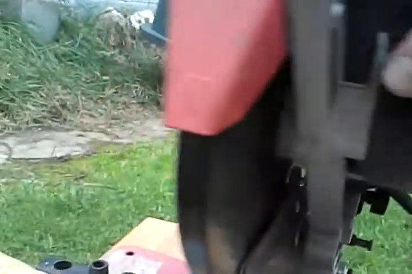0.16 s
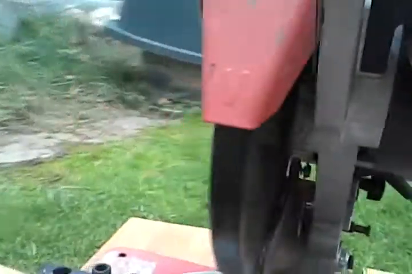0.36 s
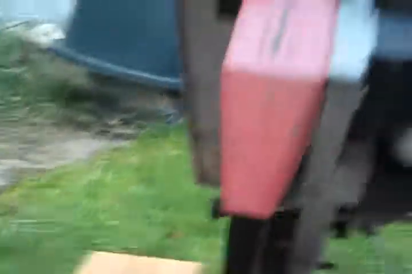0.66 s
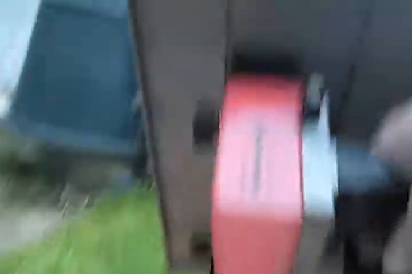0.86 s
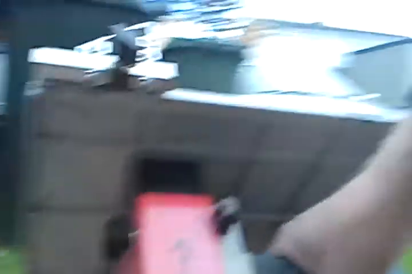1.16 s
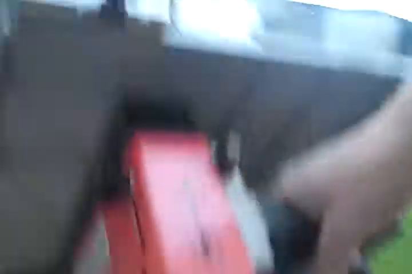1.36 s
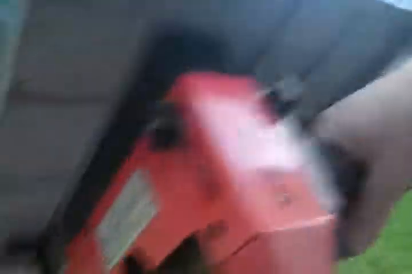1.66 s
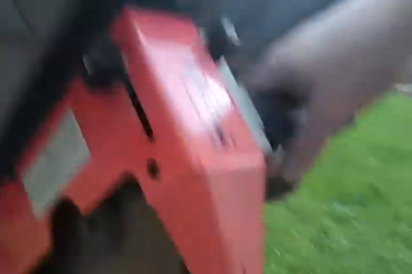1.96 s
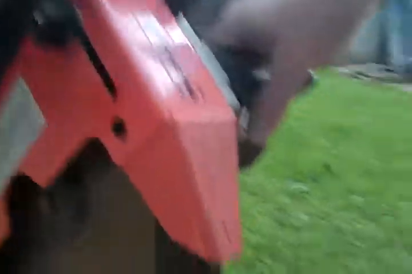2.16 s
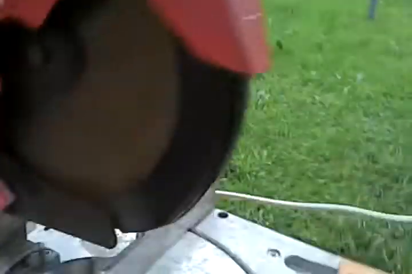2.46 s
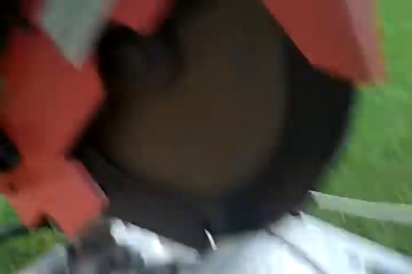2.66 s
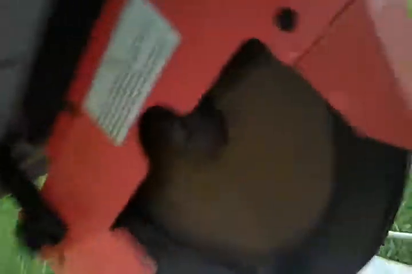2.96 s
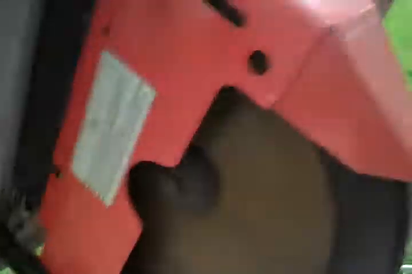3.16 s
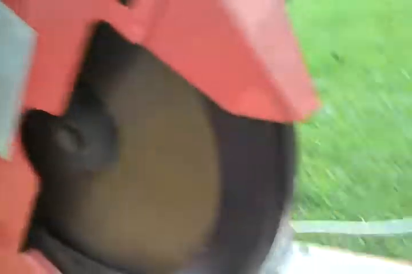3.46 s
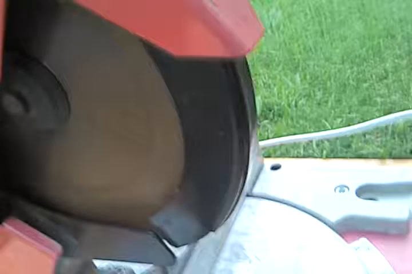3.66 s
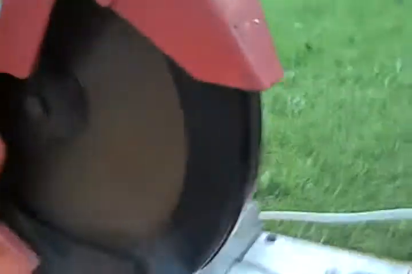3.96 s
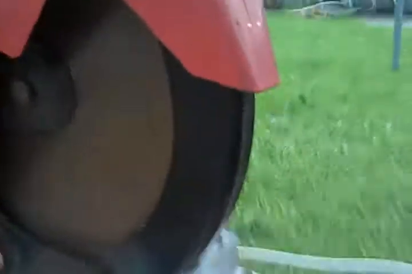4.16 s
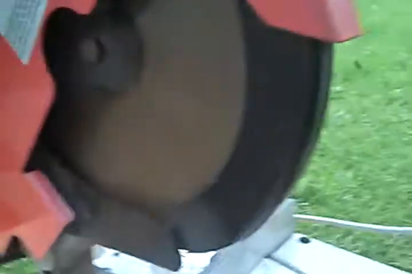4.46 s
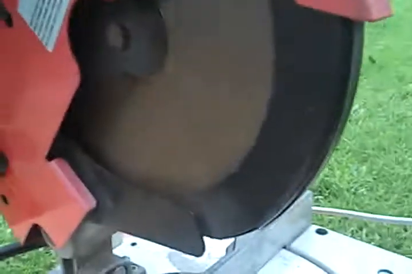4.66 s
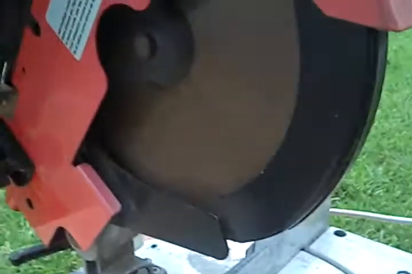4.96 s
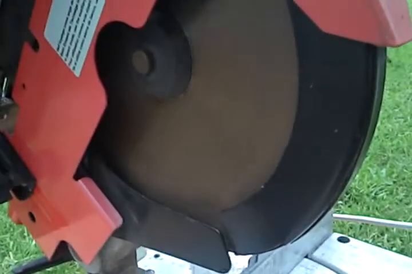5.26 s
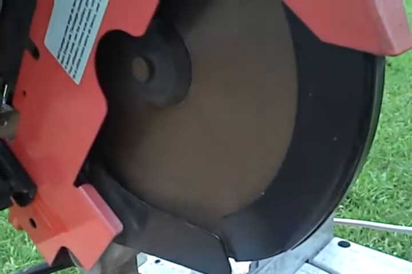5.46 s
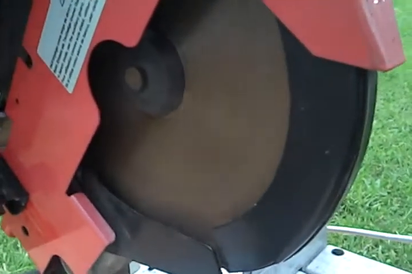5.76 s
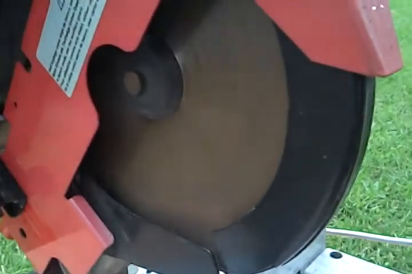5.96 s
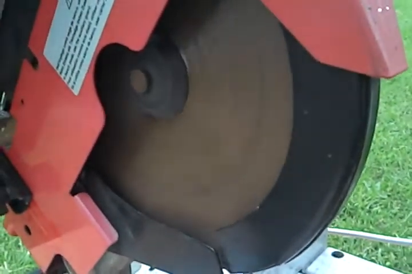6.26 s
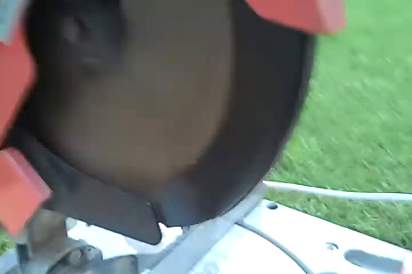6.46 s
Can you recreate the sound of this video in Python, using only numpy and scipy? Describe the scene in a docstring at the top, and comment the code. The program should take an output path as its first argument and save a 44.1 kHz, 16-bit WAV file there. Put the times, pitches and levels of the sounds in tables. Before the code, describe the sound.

Outdoors, close to a power saw that is already slowing down. Harsh gear rattle pulses rapidly with each turn of the disc, under rushing fan air and falling whines. A few hard clacks come early, then the pulsing smooths out as the microphone moves to the disc side. Pitch and loudness keep sinking to a quiet, dry grinding whirr. Low wind buffets hit the handheld stereo microphone near the end.

```python
"""A cut-off saw coasts down almost to rest on a lawn while a phone is moved round it at arm's length.
At first the phone faces the motor end: gear teeth rattle guard and disc, throbbing once a disc turn,
under fan air and whines that fall with the shaft. From about 0.9 to 1.9 s come a few hard strokes.
By about 1.6 s the disc side faces the phone, and its throb dies out as the shaft slows.
A few soft handling thumps come early; from about 5 s wind blows on the two microphone ports."""
import sys
import numpy as np
from scipy import signal
from scipy.fft import rfft, irfft, next_fast_len
from scipy.io import wavfile
from scipy.ndimage import uniform_filter1d, map_coordinates

SR = 44100
rng = np.random.default_rng(int(sys.argv[2]) if len(sys.argv) > 2 else 0)


def int16_out(signal):
    """Quantize to a 16-bit WAV file."""
    q = np.round(np.clip(np.atleast_2d(signal).T, -1, 1) * 32767)
    wavfile.write(sys.argv[1], SR, q.astype(np.int16))


N = 291060
T = np.arange(N) / SR  # seconds
SIZE = next_fast_len(N + 4096)  # padded length for filtering
HZ = np.arange(SIZE // 2 + 1) * SR / SIZE + 1e-3  # just above zero, for logarithms
PINION, WHEEL = 8, 42  # teeth on the motor shaft and on the disc's gear
REFERENCE_TURNS = 100  # shaft turns per s at which part levels are given


def undb(db):
    """Decibels to gain."""
    return 10 ** (np.asarray(db) / 20)


def to_db(gain):
    """Gain to decibels."""
    return 20 * np.log10(gain)


def unit(x):
    """Scale to rms 1."""
    return x / np.sqrt(np.mean(x ** 2))


def curves(table):
    """Columns of a table, after the time column, as sample-rate curves."""
    seconds, *columns = np.transpose(table)
    return [np.interp(T, seconds, column) for column in columns]


def across(points):
    """Values joined on a log-frequency axis."""
    hz, value = np.transpose(points)
    return np.interp(np.log(HZ), np.log(hz), value)


def colour(x, response):
    """Filter by a frequency response."""
    return irfft(rfft(x, SIZE) * response, SIZE)[..., :N]


def rings(modes):
    """Summed response of damped resonances, neighbours in opposite sign."""
    total = 0
    for k, (centre, width, db) in enumerate(modes):
        resonance = 1 / (1 + 1j * (HZ ** 2 - centre ** 2) / (HZ * width))
        total = total + (-1) ** k * undb(db) * resonance
    return total


def swell(hz, modes):
    """Gain of a tone at a moving pitch as it crosses resonances."""
    return sum(undb(db) / (1 + (2 * (hz - centre) / width) ** 2) for centre, width, db in modes)


def walk(rate):
    """Random levels, rate per second, held and smoothed twice; spread near 1."""
    hold = int(SR / rate)
    steps = np.repeat(rng.standard_normal(N // hold + 1), hold)
    return unit(uniform_filter1d(uniform_filter1d(steps, hold), hold)[:N])


def delay(x, ms):
    """Read the sound a moving fraction of a millisecond late."""
    return map_coordinates(x, [np.arange(N) - ms * SR / 1000], order=3, mode="nearest")


START_TURNS = 139.47  # shaft turns per s
BEARING_LOSS, AIR_LOSS = 18.49, 1.97  # turns per s lost each second, the air's at reference speed
AIR_POWER = 3.537  # how steeply the air loss grows with speed


def speed():
    """Shaft turns per second: bearings take a steady amount, air takes more at high speed."""
    turns = np.linspace(START_TURNS, 0, num=4000)
    loss = BEARING_LOSS + AIR_LOSS * (turns / REFERENCE_TURNS) ** AIR_POWER
    seconds = np.cumsum(START_TURNS / len(turns) / loss)
    return np.interp(T, seconds, turns)


# Resonances of the saw's parts. Each row: pitch in Hz, width in Hz, strength in dB within its part.
DISC = [(4400, 28, 1), (4770, 248, 8), (5004, 310, 1.5), (5280, 273, 1.5), (4820, 880, -7.5)]
HOUSING = [(462, 157, -8.5), (856, 265, -5), (978.4, 69, 2), (1227, 210, -11)]
GUARD_LOW = [(2318, 100, -9), (2425, 60, -5), (2563, 42, 1.5), (2810, 110, -11)]
GUARD_HIGH = [(2980, 70, -3), (3170, 200, -2), (3505, 85, 3.5), (3700, 45, -2), (3900, 45, -4)]
THIN = [(5826, 80, -4), (6592, 100, 0), (7408, 70, -3), (7930, 150, -7), (8814, 110, -9)]
BOOM = [(470, 122, -5.5), (618.6, 73.4, 4.5), (674, 250, -8)]
OPEN_SIDE = [(1192, 44, -7.5), (1502, 207, -2), (1767, 244, 2), (2250, 210, 4.5)]
RASP = [(2010, 460, -1.2), (2430, 120, -0.0094), (3034, 180, -0.18), (4280, 250, 2), (4980, 134, 0.6),
        (5420, 170, -2.4)]
SIZZLE = [(7220, 670, 0)]
# Tone colour of the fan air. Each row: frequency in Hz, strength in dB within the air.
AIR = [(40, -34), (150, 1), (300, 3), (500, 2), (1300, -9), (1700, 3), (2050, 20), (4000, 9.5), (8500, 19),
       (10000, 13.5), (11500, 15.5), (15000, 10)]


def part_responses():
    """Each part rings at its own resonances; the fan air has a broad colour instead."""
    return {"disc": rings(DISC), "housing": rings(HOUSING), "low guard": rings(GUARD_LOW),
            "high guard": rings(GUARD_HIGH), "thin rings": rings(THIN), "fan air": undb(across(AIR)),
            "boom": rings(BOOM), "open side": rings(OPEN_SIDE), "rasp": rings(RASP),
            "sizzle": rings(SIZZLE)}


# The phone's walk round the saw. Each row: time in seconds, nearness in dB,
# facing the motor end from 0 to 1, facing the bare disc from 0 to 1.
WALK = [(0, 2, 1, 0.3), (.13, 0, 0.92, 0.4), (.18, -0.7, 0.89, 0.44), (.55, -2, 0.87, 0.28),
        (.9, -2.5, 0.73, 0.16), (1.1, -4.5, 0.71, 0.27), (1.4, -2, 0.52, 0.35), (1.57, -1.5, 0.3, 0),
        (1.64, 0.5, 0.03, 0.08), (2.0, 0, 0.03, 0), (2.3, -0.2, 0.16, 0.28), (2.65, 0.3, 0.05, 0.6),
        (2.95, 2, 0.03, 0.52), (3.4, 0.74, 0.1, 0.82), (4.1, 1.15, 0.17, 0.97), (4.8, 0.6, 0, 0.86),
        (5.0, 0.1, 0.16, 1), (5.5, -1, 0.07, 1), (6.0, -2.5, 0.29, 1), (6.33, -4.5, 0.27, 1),
        (6.6, -7, 0.36, 0.84)]
# The saw's parts at the right port. Each entry: level in dB at reference speed, dB per dB of speed,
# gain in dB facing the motor end, gain in dB facing the bare disc, share of the throb,
# gain in dB on the way to the left port.
PARTS = {"disc": (-13.5, 1.16, -9, 1, 1, -3.5), "housing": (-26.5, 0.62, 2.5, -2, 0.16, -0.7),
         "low guard": (-24.5, 1.21, -8, 10, 1.2, -1), "high guard": (-22.5, 1.06, -13, 3, 0.98, 2),
         "thin rings": (-20.5, 1.99, -9, 6, 0.93, -3.5), "fan air": (-21.5, 2, -2, 1.5, 0.09, 3),
         "boom": (-38, 0.74, 13, 4.5, -0.5, 2), "open side": (-37.5, 0.35, -5.5, 10.5, 0.97, 3.5),
         "rasp": (-22, 2, 0.6, 4.5, 0.9, -8), "sizzle": (-23.5, 1.24, -12, 1.5, -0.44, -3)}
AIR_FLOOR_DB = -53.5  # faint hiss that stays when the fan has slowed
# a part flares while this multiple of the shaft speed crosses its rings
GUARD_FLARE_MULTIPLE, GUARD_FLARE_GAIN = 24, 1.8
DISC_FLARE_MULTIPLE, DISC_FLARE_GAIN = 32, 0.9


def heard(turns):
    """Level curve of each part in dB from speed, nearness and the side that faces the phone."""
    near_db, motor, bare = curves(WALK)
    speed_db = to_db(turns / REFERENCE_TURNS)
    levels = {}
    for name, (db, slope, motor_db, bare_db, _, _) in PARTS.items():
        levels[name] = db + slope * speed_db + near_db + motor_db * motor + bare_db * bare
    levels["fan air"] = to_db(np.hypot(undb(levels["fan air"]), undb(AIR_FLOOR_DB)))
    guard_flare = GUARD_FLARE_GAIN * swell(GUARD_FLARE_MULTIPLE * turns, GUARD_LOW)
    disc_flare = DISC_FLARE_GAIN * swell(DISC_FLARE_MULTIPLE * turns, DISC)
    levels["low guard"] = levels["low guard"] + to_db(1 + guard_flare)
    levels["disc"] = levels["disc"] + to_db(1 + disc_flare)
    return levels


STROKE_RISE, STROKE_FALL = 0.05, 0.26  # turns
SECOND_AT, SECOND_SHARE = 0.42, 0.38  # turns after the first stroke, strength beside it
STROKE_LEAD = 0.25  # turns by which the first stroke starts before the loud spot


def strokes(turn):
    """Two sudden strokes a disc turn that die away, from -1 to about 1."""
    def one(age):
        return np.exp(-age / STROKE_FALL) - np.exp(-age / STROKE_RISE)

    start = turn + STROKE_LEAD
    both = one(start % 1) + SECOND_SHARE * one((start - SECOND_AT) % 1)
    return 2 * both / both.max() - 1


# The phone's bearing round the disc shifts the loud spot. Each row: time in seconds, bearing in turns.
BEARING = [(0.0, 0.015), (0.12, -0.3), (0.48, -0.18), (0.72, -0.16), (0.9, -0.28), (1.1, -0.29),
           (1.25, -0.21), (1.5, -0.32), (1.68, -0.656), (2.6, -0.74), (2.9, -0.68), (6.6, -0.34)]
# Single hard strokes. Each row: start in seconds, dB added to the throb.
CLACKS = [(0.964, 4), (1.149, 5), (1.529, 7), (1.716, 0), (1.820, 3), (1.876, 5)]
CLACK_FALL_S = 0.01
SWING_MOTOR_DB = 7.5  # facing the motor end
SWING_DISC_DB = 6  # at the disc side at reference speed
SWING_ENDS_TURNS = 52  # shaft turns per s below which the disc side stops throbbing


def throb(turns, shaft, scatter_db=0.54, skew=0.16, peaked=0.18):
    """The out-of-true disc loads the gears once a turn; result in dB before each part takes its share."""
    motor_side = np.clip(curves(WALK)[1], 0, 1) ** 2
    fading = np.clip((turns - SWING_ENDS_TURNS) / (REFERENCE_TURNS - SWING_ENDS_TURNS), 0, None)
    turn = shaft * PINION / WHEEL - curves(BEARING)[0]
    angle = 2 * np.pi * turn
    # the load comes on quickly, peaks briefly and eases off slowly
    load = np.cos(angle + skew * np.cos(angle))
    motor_db = SWING_MOTOR_DB * (load + peaked * load ** 2)
    disc_db = SWING_DISC_DB * fading * strokes(turn)
    throb_db = motor_side * motor_db + (1 - motor_side) * disc_db + scatter_db * walk(30)
    for start, db in CLACKS:
        throb_db = throb_db + db * (T > start) * np.exp(-np.abs(T - start) / CLACK_FALL_S)
    return throb_db


# How alike the knocks are at the two ports. Each row: frequency in Hz, likeness from 0 to 1.
ALIKE = [(300, 1), (1200, 0.89), (1700, 0.79), (2500, 0.6), (4500, 0.5), (8000, 0.2)]


def rattle(turns, shaft, flicker_db=0.88, flutter_db=1.34):
    """Dense tooth knocks, made of noise, ring each part; the left port hears them partly by other paths."""
    throb_db = throb(turns, shaft)
    alike = np.clip(across(ALIKE), 0, 1)
    knocks = rng.standard_normal((2, N))
    knocks[0] = colour(knocks[1], alike) + colour(knocks[0], np.sqrt(1 - alike ** 2))
    responses, levels = part_responses(), heard(turns)
    out = 0
    for name, (*_, share, left_db) in PARTS.items():
        gate = undb(share * throb_db + flicker_db * walk(10) + share * flutter_db * walk(45))
        # even out the slow level so that the gate only shapes the throb
        gate = gate / np.sqrt(uniform_filter1d(gate ** 2, size=SR // 5))
        own = np.roll(knocks, rng.integers(N), axis=1)  # every part is knocked at its own moments
        ringing = unit(colour(own * gate, responses[name]))
        out = out + undb(levels[name]) * ringing * np.array([[undb(left_db)], [1]])
    return out


# Multiples of the shaft speed that whine, in a plain list.
WHINE_ORDERS = (8, 12, 15, 26, 32, 64)
# Resonances each whine falls through, one list for each multiple above.
# Each row: pitch in Hz, width in Hz, level in dB.
SWELLS = [
    [(1120, 36, -37), (985, 50, -33), (812, 60, -36), (724, 50, -36), (619, 70, -31), (530, 60, -33),
     (447, 45, -39), (362, 45, -42)],
    [(975, 60, -28.5), (800, 90, -43), (600, 110, -43)],
    [(2065, 60, -27), (1740, 60, -42)],
    [(3260, 200, -34)],
    [(4150, 110, -31), (3620, 220, -33), (3300, 240, -28), (2960, 240, -28), (2480, 220, -22.5),
     (1780, 130, -34), (1620, 150, -30), (1450, 130, -36), (1200, 150, -39), (960, 150, -39.5)],
    [(6800, 500, -36), (5200, 600, -27), (3270, 250, -33), (1550, 310, -39)],
]
# Fainter whines. Each row: multiple of the shaft speed, level in dB against the fan air.
ORDERS_DB = [(16, -19), (20, -20), (24, -17), (28, -21), (36, -21), (44, -19), (60, -20)]


def whine(turns, shaft, wobble=0.25, waver_db=3.0, rough_db=2.8, slur=0.1):
    """Gear mesh and commutator: trembling sines on shaft multiples; the disc turn adds side lines."""
    swing = 1 + wobble * np.cos(2 * np.pi * shaft * PINION / WHEEL)
    air_db = heard(turns)["fan air"]
    lines = [(multiple, swell(multiple * turns, modes)) for multiple, modes in zip(WHINE_ORDERS, SWELLS)]
    lines += [(multiple, undb(air_db + db + waver_db * walk(2.91))) for multiple, db in ORDERS_DB]
    total = 0
    for multiple, gain in lines:
        rough = undb(rough_db * walk(45))
        phase = multiple * shaft + slur * walk(40)  # in cycles
        total = total + gain * rough * np.sin(2 * np.pi * phase)
    return np.sqrt(2) * swing * total


# The left port lies behind the phone's body.
# Each row: time in seconds, left minus right in dB in the bass, in the middle, in the treble.
SHADE = [(0.0, 7, 0, -2.5), (0.6, 7, 3, 0), (1.25, 6.5, -6, -0.5), (1.6, 6, -3, -4), (2.3, 5.5, -3, -0.5),
         (3.0, 7, -0.5, 0.5), (3.9, 4, 2, 3), (4.6, 3, -4, 1), (6.6, 9, -2.5, 4)]
# How late the left port hears. Each row: time in seconds, bass delay in ms, middle and treble delay in ms.
LAG = [(0, 0.048, 0.051), (.8, 0.091, 0.059), (1.3, 0.16, 0.27), (2.4, 0.12, 0.33), (3.5, 0.12, 0.32),
       (5, 0.15, 0.28), (6.6, 0.15, 0.3)]
# Steady colour of the left port. Each row: frequency in Hz, gain in dB.
LEFT_PORT = [(300, -11.5), (1000, -6.5), (1400, 4.5), (1800, 4.5), (2050, -2.5), (2500, -1), (3150, -10.5),
             (3700, -3), (4800, -6.5), (6200, -10.5), (10000, -8), (14000, -8), (14700, -19)]


def left_port(sound):
    """Going round the phone's body delays and shades bass, middle and treble differently."""
    bass_ms, treble_ms = curves(LAG)
    bass = 1 / (1 + (HZ / 1150) ** 6)
    treble = 1 / (1 + (3900 / HZ) ** 8)
    splits = np.array([bass, 1 - bass - treble, treble])
    bands = colour(sound, undb(across(LEFT_PORT)) * splits) * undb(curves(SHADE))
    return delay(bands[0], bass_ms) + delay(bands[1] + bands[2], treble_ms)


def rumble(level_db=-51.5):
    """Steady low noise, partly shared by the ports, with a resonance at 128 Hz."""
    low = 1 / (1 + (HZ / 200) ** 2) / (1 + (25 / HZ) ** 2)
    response = low + np.abs(rings([(128, 24, 0.51)]))
    noise = rng.standard_normal(N) + 0.66 * rng.standard_normal((2, N))
    return undb(level_db) * unit(colour(noise, response))


# Single low thumps: the first three from handling the phone, the rest wind buffets.
# Each row: start in seconds, peak in dB at the louder port, left minus right in dB.
THUMPS = [(0.958, -33, 5), (2.659, -41, 6), (3.459, -39, 18), (5.415, -34, 16), (5.563, -30, 10),
          (5.649, -38, 13.5), (5.713, -23.5, 23), (5.738, -29, -11.0), (5.871, -27, 22), (5.965, -21, 27),
          (6.061, -20.5, 23), (6.084, -21, -16), (6.107, -28, 4), (6.194, -25, 7), (6.241, -38, 15),
          (6.27, -18.5, 11), (6.314, -30, 24), (6.424, -46.5, 3), (6.49, -31, 20), (6.539, -39, 8.0)]
# Longer gusts. Each row: start in seconds, length in seconds, dB at the louder port, left minus right in dB.
GUSTS = [(5.32, 0.17, -44, 16), (5.516, 0.17, -41, 15), (5.842, 0.26, -33.5, 23), (6.077, 0.16, -37, -3),
         (6.192, 0.17, -28, 30), (6.388, 0.084, -40, -6), (6.446, 0.24, -33.5, 21)]
GUST_EDGE_S = 0.035
BREEZE_DB, BREEZE_FROM_S, BREEZE_RISE_S = -56, 4.9, 0.53


def thumps_and_wind(gust_db=0.5, fall_s=0.0034):
    """Low noise at each port on its own, swelling with handling thumps, a breeze, gusts and buffets."""
    def ports(db, pan_db):
        return undb(db + np.array([min(pan_db, 0), min(-pan_db, 0)]))

    strength = undb(BREEZE_DB) * np.clip((T - BREEZE_FROM_S) / BREEZE_RISE_S, 0, 1)
    for start, length, db, pan_db in GUSTS:
        to_edge = np.minimum(T - start, start + length - T)
        strength = strength + np.outer(ports(db, pan_db), np.clip(to_edge / GUST_EDGE_S, 0, 1))
    strength = strength * [undb(gust_db * walk(35)), undb(gust_db * walk(35))]
    for start, db, pan_db in THUMPS:
        age = np.clip(T - start, 0, 1) / fall_s
        strength = strength + np.outer(ports(db, pan_db), age * np.exp(1 - age))
    body = 1 / (1 + (HZ / 260) ** 3) / (1 + (40 / HZ) ** 2)
    return strength * unit(colour(rng.standard_normal((2, N)), body))


def scene():
    """The saw faces the right port; the left hears it round the phone's body."""
    turns = speed()
    shaft = np.cumsum(turns) / SR  # turns made so far
    left, right = rattle(turns, shaft)
    tones = whine(turns, shaft)
    saw = np.array([left_port(left + undb(3.5) * tones), right + tones])
    return saw + rumble() + thumps_and_wind()


def record(dry, top_hz=15600):
    """The loudest peaks clip; the top is cut."""
    low_pass = signal.ellip(10, 0.2, 75, top_hz, fs=SR, output="sos")
    return signal.sosfilt(low_pass, np.clip(dry, -0.93, 0.93))


dry = scene()
out = record(dry)
int16_out(out)
```